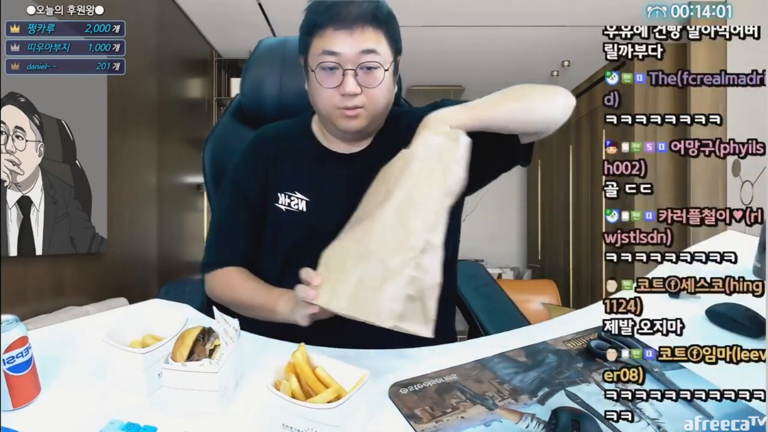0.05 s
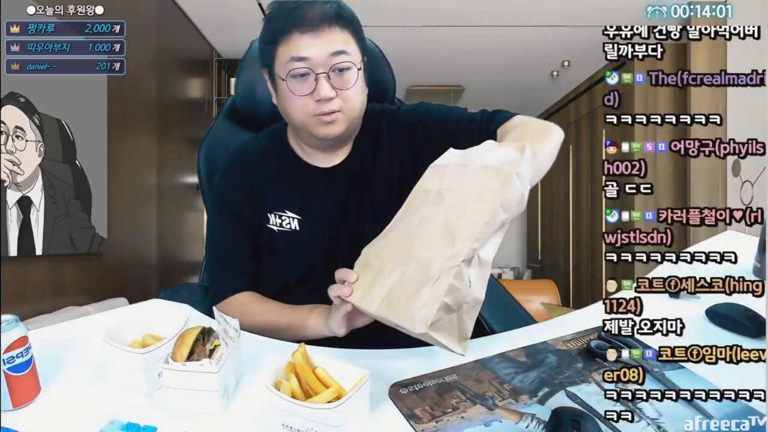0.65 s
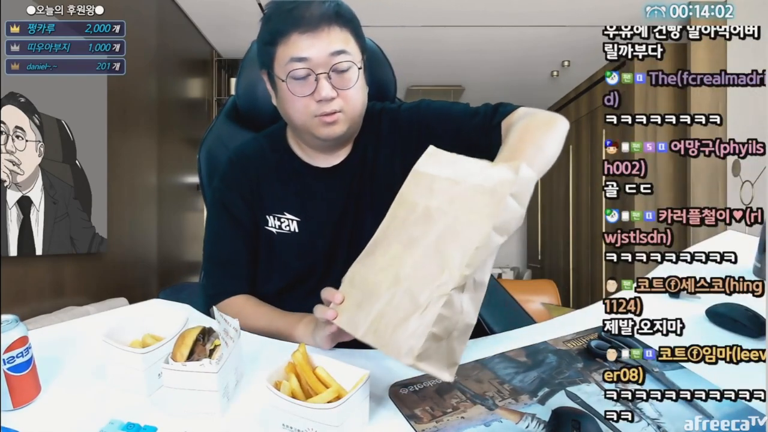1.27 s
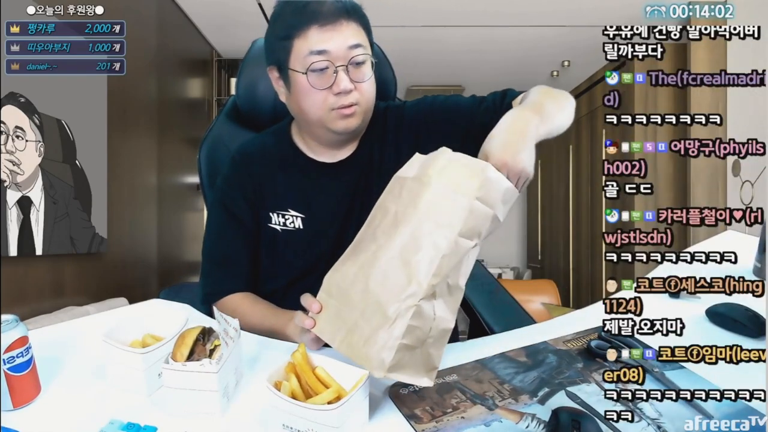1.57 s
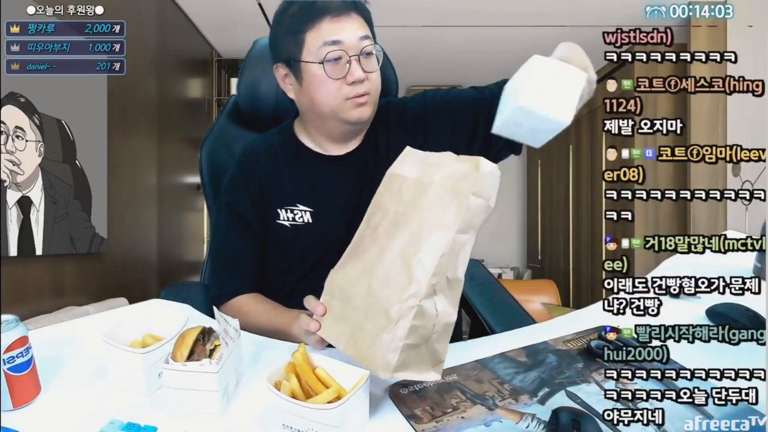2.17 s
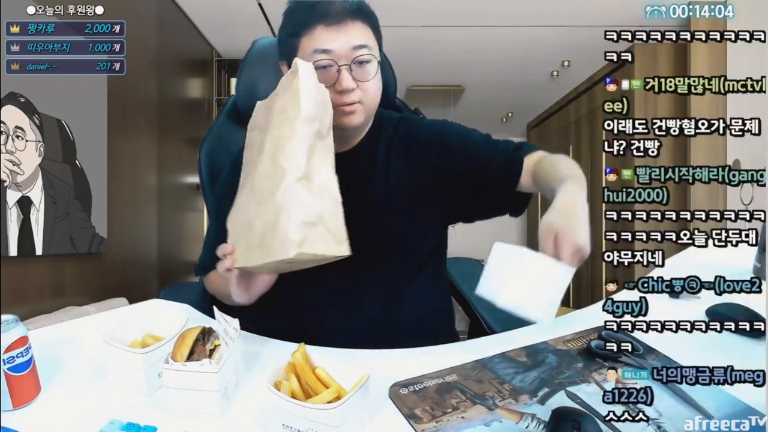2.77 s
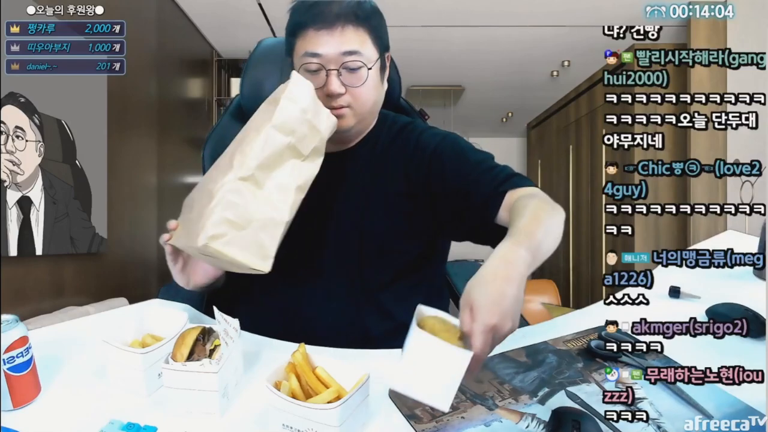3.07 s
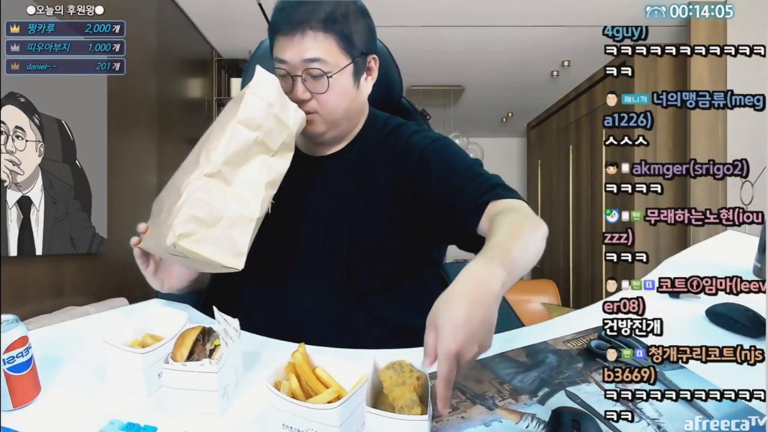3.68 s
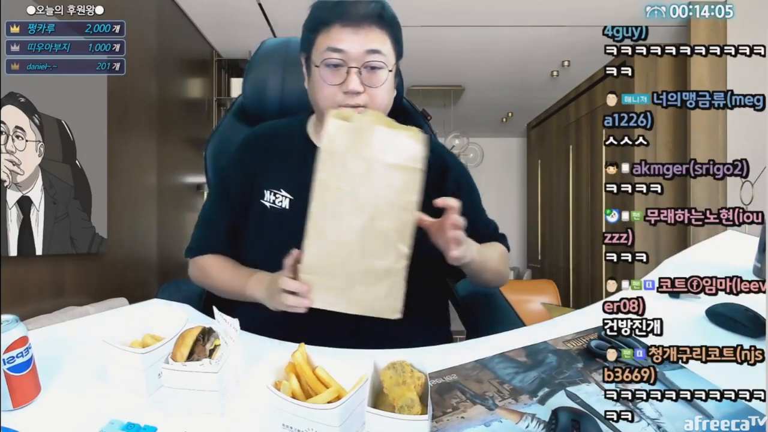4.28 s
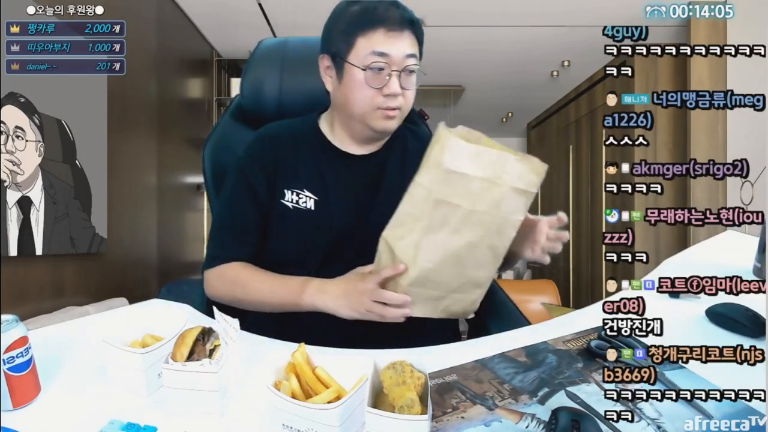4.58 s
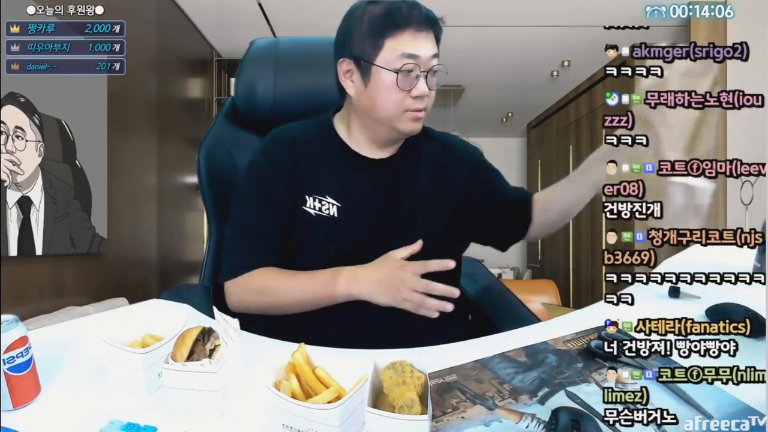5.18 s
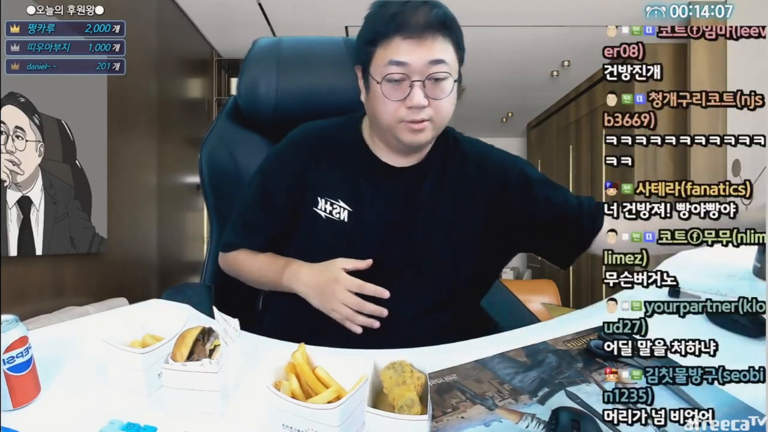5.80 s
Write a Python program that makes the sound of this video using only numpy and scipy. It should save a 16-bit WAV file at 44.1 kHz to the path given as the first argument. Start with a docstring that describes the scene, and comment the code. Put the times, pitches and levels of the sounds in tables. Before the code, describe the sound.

Close paper bag crinkling in short bursts, with light taps and scuffs of a carton on a desk and a fan running behind.

```python
"""Over the steady rush of a fan, a hand rustles in a paper takeout bag, close to one bright microphone.
It draws out a carton and sets it on a desk in a small room; then the bag is gripped again and put aside.
Friction of paper on paper hisses, small wrinkles crackle, and creases buckle with a snap that shakes
the bag's panels. Knocks and taps ring as damped resonances, and the carton scuffs over the desk.
A faint, airy whistle near 3.2 kHz swells and fades near the end."""
import sys
import numpy as np
from scipy import signal
from scipy.fft import rfft, irfft, next_fast_len
from scipy.io import wavfile

SR = 44100
rng = np.random.default_rng(int(sys.argv[2]) if len(sys.argv) > 2 else 0)


def wav_record(signal):
    """Record a signal, one row per channel, as 16-bit PCM in the file named by sys.argv[1]."""
    frames = np.transpose(np.atleast_2d(signal))
    bounded = np.clip(frames, -1, 1)
    # unit amplitude maps onto the largest positive 16-bit level
    quanta = np.round(bounded * 32767).astype(np.int16)
    wavfile.write(sys.argv[1], SR, quanta)


N = 262073

# spectrum of paper sliding on paper: (frequency [Hz], relative level [dB])
HISS_SPECTRUM = [(1500, -11), (3000, -6.5), (4200, -4), (5400, -5.5), (6500, -0.5), (8500, 2), (10000, -3),
                 (11200, -9.5), (13000, -7.5), (15500, -9.5)]


def from_db(db):
    """Amplitude ratio: a factor of ten for every 20 dB."""
    return 10 ** (np.asarray(db) / 20)


def unit_rms(x):
    """Normalisation to a mean power of 1."""
    return x / np.sqrt(np.mean(x ** 2) + 1e-20)


def in_time(rows):
    """Linear interpolation of each column of a timed table, sample by sample."""
    times, *columns = np.transpose(rows)
    return [np.interp(np.arange(N) / SR, times, column) for column in columns]


def at_hz(points, hz):
    """Interpolation of a table on a logarithmic frequency axis."""
    known_hz, values = np.transpose(points)
    return np.interp(np.log(np.maximum(hz, 1)), np.log(known_hz), values)


def coloured(x, spectrum):
    """Filtering by multiplication in the frequency domain; rms 1."""
    size = next_fast_len(N)
    hz = np.arange(size // 2 + 1) * SR / size
    return unit_rms(irfft(rfft(x, size) * from_db(at_hz(spectrum, hz)), size)[:N])


def noise(spectrum):
    """Stationary Gaussian noise of a given spectral shape; rms 1."""
    return coloured(rng.standard_normal(N), spectrum)


def add(track, time_s, sound):
    """Superposition of a sound on a track, from a given time."""
    start = max(0, round(time_s * SR))
    track[start:start + len(sound)] += sound[:max(0, N - start)]


def fan(air_db=-47.5, hum_hz=165.8, hum_db=-58):
    """Moving air gives broadband noise; the motor adds a faint pure tone."""
    # air noise: (frequency [Hz], relative level [dB])
    air_spectrum = [(15, -37.5), (25, -30.5), (45, -15.5), (70, 2.5), (100, -3.5), (140, 1.5), (200, -2.5),
                    (255, 0), (450, -7), (900, -12), (1450, -14), (1900, -24.5), (5200, -33), (8300, -26),
                    (15500, -38)]
    hum = np.sqrt(2) * np.sin(2 * np.pi * hum_hz * np.arange(N) / SR)
    return from_db(air_db) * noise(air_spectrum) + from_db(hum_db) * hum


def hand_inside(hiss_boost_db=4, panel_boost_db=1, fade_s=.012):
    """Sustained friction: gains of hiss and panel rustle, fading as the hand enters and leaves."""
    # the hand searches: (time [s], hiss level [dB], panel level [dB]), before the boosts
    rummage = [(0.09, -56, -57.5), (0.152, -43.5, -56), (0.272, -34.5, -56), (0.318, -36, -46.5),
               (0.372, -37, -49.5), (0.484, -39.5, -57), (0.716, -63.5, -55), (0.916, -58, -56),
               (1.07, -58.5, -71)]
    # it drags the carton out along the paper: same columns
    pull = [(1.07, -59.5, -63.5), (1.224, -45.5, -44), (1.328, -32.5, -40.5), (1.428, -34, -38.5),
            (1.504, -37.5, -41.5), (1.746, -40.5, -48), (1.972, -48.5, -54.5), (2.096, -52.5, -48.5),
            (2.18, -67, -62)]
    t, path = np.arange(N) / SR, np.vstack([rummage, pull])
    hiss_db, panel_db = in_time(path)
    outside_s = np.abs(t - np.clip(t, path[0, 0], path[-1, 0]))
    return np.exp(-outside_s / fade_s) * from_db([hiss_db + hiss_boost_db, panel_db + panel_boost_db])


def sliding():
    """Incoherent sources add by power: hiss and panel gains of the hand inside plus every slip."""
    # the grip slips: (peak time [s], hiss level [dB], rise [s], fall [s], panel re hiss [dB])
    slips = [(.096, -33, 0.0023, 0.028, -21.5), (.222, -25, 0.0064, 0.013, -16),
             (.5, -40, 0.018, 0.017, -0.5), (.72, -40.5, 0.13, .04, -10),
             (1.265, -26.5, 0.0031, 0.033, -13.5), (1.351, -27.5, 0.062, 0.033, -11.5),
             (2.625, -38, 0.027, 0.058, -6), (2.848, -41.5, 0.025, 0.051, -5.5),
             (3.01, -54, .06, 0.091, -8), (3.113, -44, 0.02, .022, -3.5), (3.64, -44.5, 0.038, 0.14, -4),
             (3.798, -55, .02, 0.074, 6), (4.99, -36.5, 0.066, 0.092, 2), (5.17, -56, .025, 0.024, 10),
             (5.29, -49.5, 0.013, 0.063, 3.5), (5.47, -50, 0.023, .04, -10), (5.89, -47, 0.096, 0.18, -8)]
    t, power = np.arange(N) / SR, hand_inside() ** 2
    for peak_s, hiss_db, rise_s, fall_s, panel_db in slips:
        exponent = np.where(t < peak_s, ((t - peak_s) / rise_s) ** 2, (t - peak_s) / fall_s)
        swell = np.exp(-np.minimum(exponent, 20))
        power = power + (from_db([[hiss_db], [hiss_db + panel_db]]) * swell) ** 2
    return np.sqrt(power)


def wrinkles(per_s, spread_db=6.0):
    """A Poisson process: energy impulses of tiny wrinkles giving way, many faint and a few strong."""
    gives_way = rng.random(N) < per_s / SR
    return gives_way * from_db(spread_db * np.minimum(rng.exponential(1, N), 3.5)) ** 2


def crackle(energy, decay_s, spectrum):
    """Impulse excitation: each impulse starts a noisy flutter whose power decays exponentially; rms 1."""
    flutter_power = signal.lfilter([1], [1, -np.exp(-1 / (decay_s * SR))], energy + 1e-18)
    return coloured(np.sqrt(flutter_power) * rng.standard_normal(N), spectrum)


def rustle(grain_db=-4.5, friction_db=-4.0, panel_grain_db=-1.5, panel_friction_db=-8.0):
    """Friction hisses and wrinkles crackle; broad panels radiate both lower and drive cavity modes."""
    # rustling panels: (frequency [Hz], relative level [dB])
    panel_spectrum = [(20, -31.5), (70, -25), (160, -3), (280, -0.5), (480, 5), (850, 2), (1100, 6),
                      (1480, -3.5), (1850, -8), (2800, -2), (5000, -11.5)]
    # air resonances of the open bag: (frequency [Hz], bandwidth [Hz])
    cavity_modes = [(850, 205), (1490, 210)]
    # their excitation as the hand moves: (time [s], lower mode gain [dB], upper mode gain [dB])
    cavity_gains = [(.2, 8, 24.5), (.7, 3, -7), (1.4, -4.5, 15), (1.9, -0.5, 3), (3.699, 3, -20),
                    (5.0, -11.5, -1.5), (5.9, 0.5, 0)]
    hiss_gain, panel_gain = sliding()
    energy = wrinkles(per_s=380)
    hiss = from_db(grain_db) * crackle(energy, decay_s=.0018, spectrum=HISS_SPECTRUM)
    hiss += from_db(friction_db) * noise(HISS_SPECTRUM)
    panels = from_db(panel_grain_db) * crackle(energy, decay_s=.0025, spectrum=panel_spectrum)
    panels += from_db(panel_friction_db) * noise(panel_spectrum)
    air = sum(from_db(gain_db) * signal.lfilter(*signal.iirpeak(hz, hz / width_hz, fs=SR), panels)
              for (hz, width_hz), gain_db in zip(cavity_modes, in_time(cavity_gains)))
    return hiss_gain * hiss + panel_gain * (panels + air)


def wide_hiss(above_hz=9950):
    """Opposite polarity at the two ears spreads the top of the hiss while the hand is in the bag."""
    hiss_gain, _ = hand_inside()
    highpass = signal.ellip(8, .5, 70, above_hz, "high", fs=SR, output="sos")
    top = signal.sosfilt(highpass, noise(HISS_SPECTRUM))
    return hiss_gain * top * np.array([[1], [-1]])


def burst(spectrum, tilt_db_per_octave, rise_s, decay_s):
    """A noise transient with tilted treble and exponential decay, with the energy of 1 ms at rms 1."""
    t = np.arange(4096) / SR
    hz = np.arange(len(t) // 2 + 1) * SR / len(t)
    colour = from_db(at_hz(spectrum, hz) + tilt_db_per_octave * np.log2(np.clip(hz, 2500, 11000)))
    envelope = (1 - np.exp(-(t / rise_s) ** 2)) * np.exp(-t / decay_s)
    sound = envelope * irfft(rfft(rng.standard_normal(len(t))) * colour)
    return sound * np.sqrt(SR / 1000 / np.sum(sound ** 2))


def snaps(strain_db=-15.5, strain_s=.0037, crack_db=1.0, panel_ring_s=.0049):
    """Buckling: a crease creaks under strain, cracks, and shakes the panel around it."""
    # buckling creases: (time [s], base level [dB], fold size [0-1])
    creases = [ (.163, -33, 0.9), (.172, -31.5, 0.95), (.183, -23, 0.45), (0.271, -24.5, 0.72),
               (.297, -6, 0.04), (0.3618, -17, 0.46), (.459, -24, 0.34), (.494, -23, 0.56),
               (0.511, -31.5, 0.87), (0.6552, -25, 0.53), (0.708, -30, 0.74), (.732, -24.5, 0.03),
               (.833, -28.5, 0.75), (0.8861, -35, 0.63), (0.9251, -30.5, 0.81), (1.3651, -11.5, 0.26),
               (1.4332, -14.5, 0.58), (1.4391, -14.5, 0.53), (1.464, -20, 0.88), (1.47, -8, 0.31),
               (1.4743, -11, 0.39), (1.5498, -21, 0.68), (1.591, -23.5, .65), (1.6162, -15.5, 0.47),
               (1.96, -25.5, 0), (2.0998, -26, 0.76), (2.607, -10, 0.29), (2.688, -31, 0.63),
               (2.829, -27.5, 0.41), (2.8496, -27.5, 0.65), (3.0526, -40, 0.69), (3.3229, -36.5, 0.51),
               (3.5247, -41.5, 0.3), (3.625, -25, 0.5), (3.791, -30.5, 0.65), (3.9929, -33, 0.62),
               (4.2464, -31, 0.6), (4.909, -31.5, 0.2), (4.9201, -12, 0.3), (4.9263, -11.5, 0),
               (4.9284, -21.5, 0.73), (4.9547, -19.5, 0.67), (4.9627, -14, 0.5), (4.9723, -9.5, .15),
               (4.9867, -15, 0.2), (4.9996, -18, 0.3), (5.0089, -16.5, 0.34), (5.031, -26.5, 0.93),
               (5.0423, -18, 0), (5.1004, -22.5, 0.17), (5.1229, -23.5, 0.33), (5.136, -24, 0.56),
               (5.169, -39, .95), (5.243, -38, 0.9), (5.27, -29.5, 0.64), (5.278, -35.5, 0.85),
               (5.421, -37.5, 0.65), (5.8505, -25.5, 0.72), (5.9352, -25, 0.9), (5.9402, -14, 0.6)]
    # the crack before its tilt: (frequency [Hz], relative level [dB])
    crack_spectrum = [(1500, -17.5), (3000, -5.5), (4200, -1.5), (5400, -7.5), (6500, 1.5), (8200, 1.5),
                      (9600, 1), (11200, -11.5), (13000, -9), (15300, -20.5), (17000, -16.5)]
    # the shaken panel: (frequency [Hz], relative level [dB])
    panel_spectrum = [(25, -43), (80, -34.5), (200, 2.5), (450, 0), (850, -2), (1450, 5.5), (1850, -5),
                      (2700, -0.5), (4000, -10.5), (6500, -16.5)]
    out = np.zeros(N)
    for time_s, level_db, size in creases:
        # a bigger fold sounds duller, lasts longer and shakes the panel harder
        tilt_db_per_octave = 5.5 - 14 * size
        decay_s = .0018 * 4.8 ** (size ** 2)
        panel_db = -18.5 + 26 * size
        creak = burst(crack_spectrum, tilt_db_per_octave, rise_s=strain_s, decay_s=strain_s)
        crack = burst(crack_spectrum, tilt_db_per_octave, rise_s=.00048, decay_s=decay_s)
        panel = burst(panel_spectrum, 0, rise_s=.0011, decay_s=decay_s + panel_ring_s)
        add(out, time_s - strain_s, from_db(level_db + strain_db) * creak)
        add(out, time_s, from_db(level_db + crack_db) * crack)
        add(out, time_s, from_db(level_db + panel_db) * panel)
    return out


def ring(hz, t60_s, contact_s):
    """A damped oscillator, its onset rounded by a soft contact."""
    t = np.arange(SR // 3) / SR
    return from_db(-60 * t / t60_s) * (1 - np.exp(-t / contact_s)) * np.sin(2 * np.pi * hz * t)


def knocks():
    """Free vibration of one mode as a panel flexes or a hand bumps the desk; higher ones die sooner."""
    # dull impacts: (time [s], level [dB], frequency [Hz])
    impacts = [(.925, -35, 490), (1.431, -26, 453), (1.46, -28.5, 152), (1.468, -16.5, 824),
               (1.478, -35, 77.5), (1.694, -22.5, 836), (2.608, -44, 250), (3.517, -36, 168),
               (3.522, -34, 397), (3.625, -35.5, 181), (3.644, -30.5, 116), (3.69, -42, 68),
               (3.788, -34, 241), (4.935, -32, 139), (5.933, -21.5, 965)]
    out = np.zeros(N)
    for time_s, level_db, hz in impacts:
        t60_s = .072 * (200 / hz) ** .42
        add(out, time_s, from_db(level_db) * ring(hz, t60_s, contact_s=.0014))
    return out


def carton_taps():
    """Modal superposition: a tap excites all the carton's damped modes, each time a little differently."""
    # taps on the carton: (time [s], level [dB])
    taps = [(1.366, -27), (1.551, -30), (2.099, -27.5), (2.107, -28), (2.689, -37.5), (3.523, -41.5),
            (3.79, -35.5)]
    # its modes: (frequency [Hz], relative level [dB])
    modes = [(385, -4), (535, 1.5), (750, 2), (860, -10), (1090, -3.5), (1287, -8), (1450, -9)]
    out = np.zeros(N)
    for time_s, level_db in taps:
        for hz, mode_db in modes:
            strength = rng.choice([-1, 1]) * from_db(level_db + mode_db + rng.normal(0, 1))
            add(out, time_s, strength * ring(hz, t60_s=.035, contact_s=.00048))
    return out


def carton_scuffs():
    """Stick-slip friction: card catches and slips on the desk in short swells."""
    # swells: (peak time [s], level [dB], half length [s])
    swells = [(3.116, -46.5, 0.028), (3.635, -42.5, 0.015), (3.674, -47.5, 0.14), (3.791, -40, 0.019)]
    # card on the desk: (frequency [Hz], relative level [dB])
    scuff_spectrum = [(25, -38), (200, -3), (450, -7), (750, 1.5), (1000, 7), (1400, -3.5), (2000, -13),
                      (4000, -10.5), (9000, -17.5)]
    t = np.arange(N) / SR
    envelope = sum(from_db(level_db) * np.exp(-((t - peak_s) / half_s) ** 2)
                   for peak_s, level_db, half_s in swells)
    return envelope * crackle(wrinkles(per_s=880), decay_s=.0035, spectrum=scuff_spectrum)


def airy_whistle(peak_s=5.78, half_s=.17, hz=3220, width_hz=660, level_db=-63.5):
    """Resonance narrows noise to a faint, airy whistle that swells and fades near the end."""
    b, a = signal.iirpeak(hz, hz / width_hz, fs=SR)
    white = rng.standard_normal(N)
    tone = unit_rms(signal.lfilter(b, a, signal.lfilter(b, a, white)))
    swell = np.exp(-((np.arange(N) / SR - peak_s) / half_s) ** 2)
    return from_db(level_db) * swell * tone


def room(x, early_db=-12.0, early_s=.0076, tail_db=-14.5, gap_s=.0024):
    """Reverberation: early reflections from desk and body, then a diffuse tail dying band by band."""
    # decay of the room: (frequency [Hz], reverberation time [s])
    t60_curve = [(150, .3), (1000, 0.39), (4000, 0.22), (9000, 0.36), (16000, 0.06)]
    t = np.arange(SR // 2) / SR
    onset = 1 - np.exp(-(t / gap_s) ** 4)
    edges_hz = np.geomspace(80, 18000, 9)
    tail = 0
    for low, high in zip(edges_hz, edges_hz[1:]):
        bandpass = signal.butter(2, [low, high], "band", fs=SR, output="sos")
        band = signal.sosfilt(bandpass, rng.standard_normal(len(t)))
        tail = tail + band * from_db(-60 * t / at_hz(t60_curve, np.sqrt(low * high)))
    early = rng.standard_normal(len(t)) * np.exp(-t / early_s)
    response = from_db(early_db) * unit_rms(early * onset) + from_db(tail_db) * unit_rms(tail * onset)
    return signal.fftconvolve(x, response / np.sqrt(len(t)))[:N]


def scene():
    """Superposition: near sounds, room and fan are alike in both channels; only the top hiss is wide."""
    near = snaps() + rustle() + knocks() + carton_taps() + carton_scuffs() + airy_whistle()
    mono = near + room(near) + fan()
    return mono + wide_hiss()


def record(dry, low_cut_hz=32, high_cut_hz=15600):
    """Microphone response: notches colour the sound, its band is limited and peaks clip at full scale."""
    # dips in the response: (frequency [Hz], bandwidth [Hz], gain [dB])
    notches = [(326.5, 108, -38), (616.5, 134, -16), (1162, 220, -13), (2680, 430, -2.5), (4880, 600, -1.5),
               (7370, 290, -12)]
    for hz, width_hz, gain_db in notches:
        b, a = signal.iirpeak(hz, hz / width_hz, fs=SR)
        dry = dry - (1 - from_db(gain_db)) * signal.lfilter(b, a, dry)
    highpass = signal.butter(4, low_cut_hz, "high", fs=SR, output="sos")
    lowpass = signal.ellip(10, .1, 80, high_cut_hz, fs=SR, output="sos")
    clipped = np.clip(signal.sosfilt(highpass, dry), -1, 1)
    return signal.sosfilt(lowpass, clipped)


dry = scene()
out = record(dry)
wav_record(out)
```